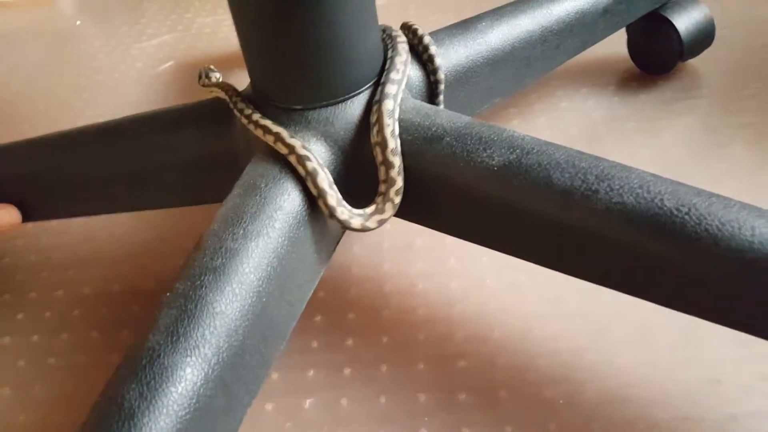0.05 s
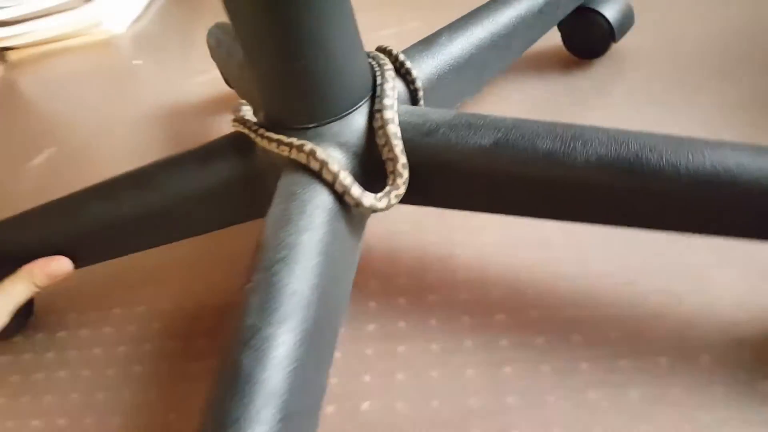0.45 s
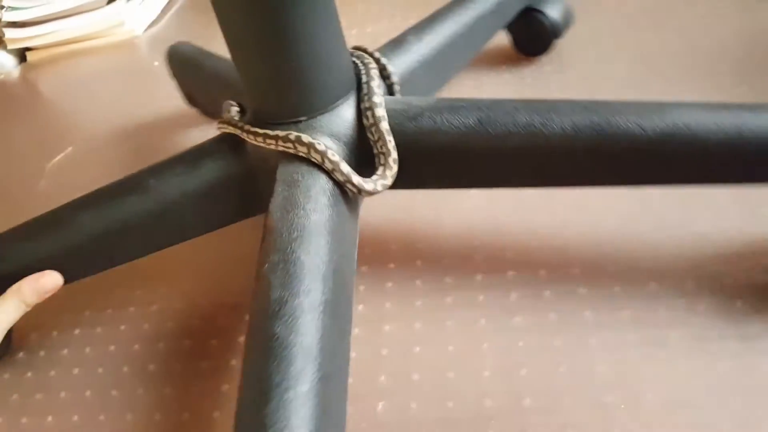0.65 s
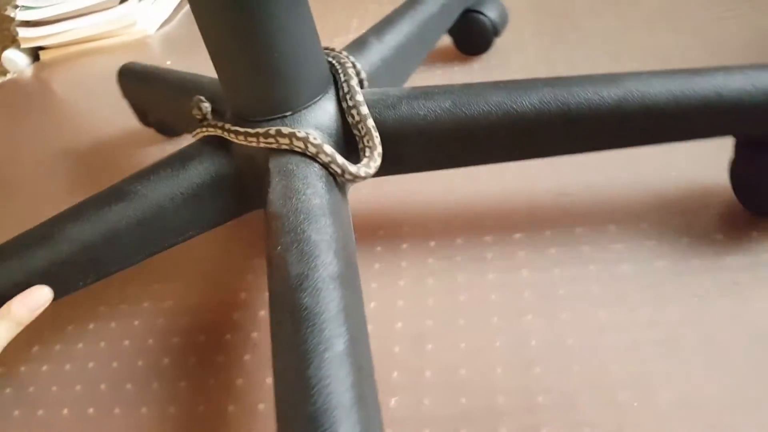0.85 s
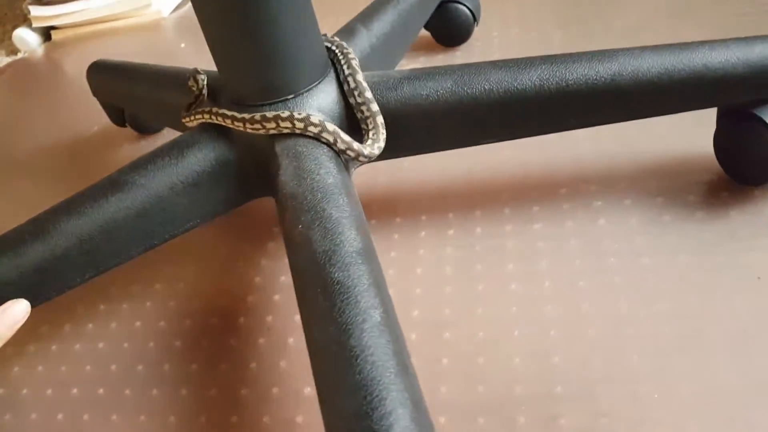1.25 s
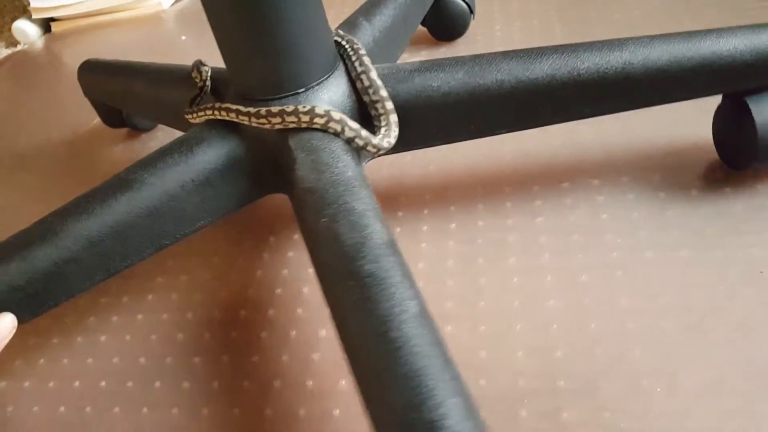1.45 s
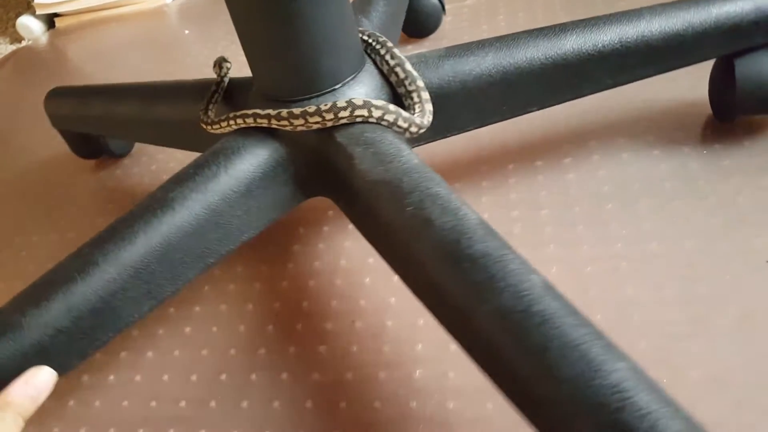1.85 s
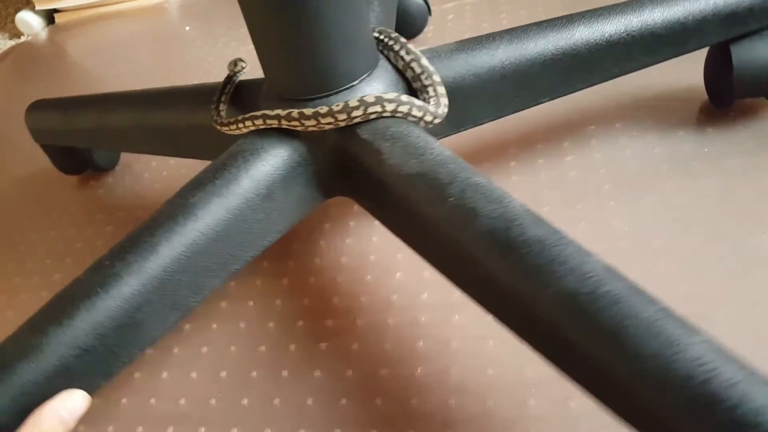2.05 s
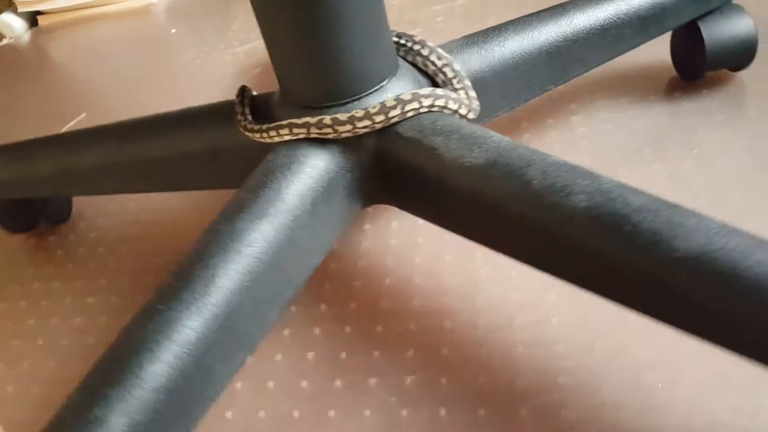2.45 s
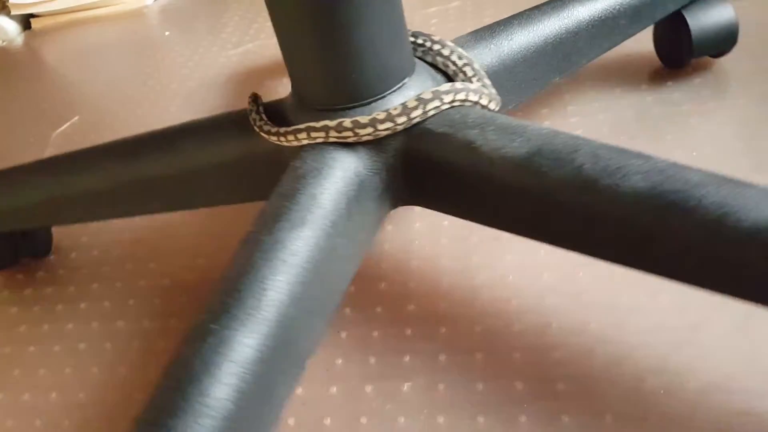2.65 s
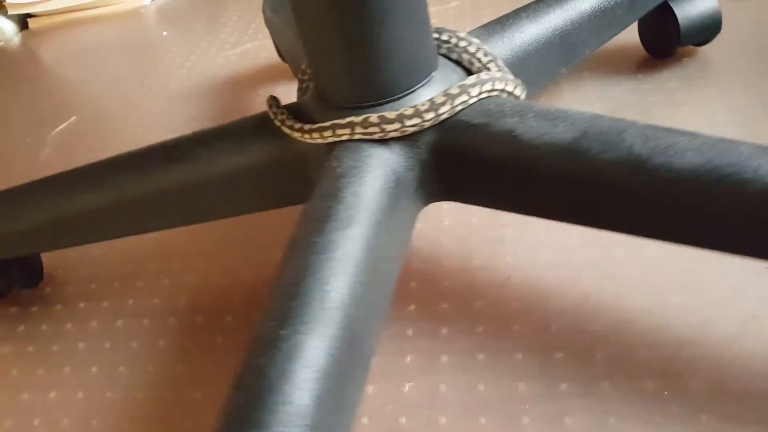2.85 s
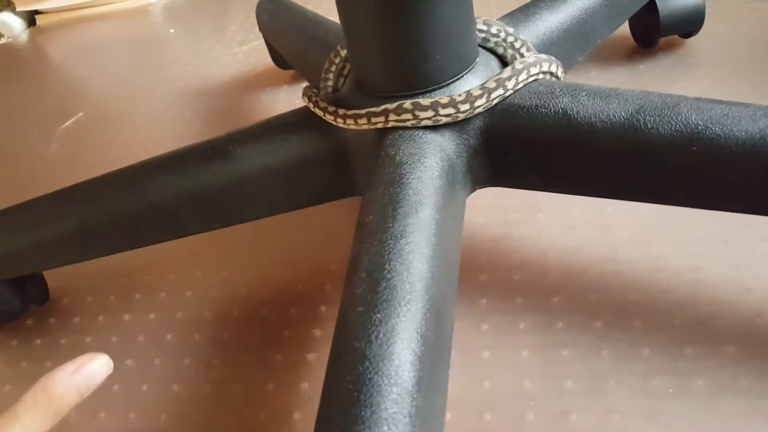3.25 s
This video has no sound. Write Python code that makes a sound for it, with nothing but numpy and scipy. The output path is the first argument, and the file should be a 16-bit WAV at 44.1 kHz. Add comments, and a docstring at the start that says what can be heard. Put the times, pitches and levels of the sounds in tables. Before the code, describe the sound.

Chair casters roll over a floor mat in two pushes, with low rumble and clicks.

```python
"""On a plastic floor mat in a quiet room, an office chair's five-legged base is turned in two pushes.
Small bumps under the casters drive the modes of the base into a rumble; dimples and studs add thumps.
Grit crunches, the casters knock as they swivel and rattle on their axles, and plastic parts tick.
Faint rustling comes with the movement, which ends in a thin scrape.
Behind it the room hisses, with a thin electrical whine."""
import sys
import numpy as np
from scipy import signal
from scipy.fft import rfft, irfft
from scipy.io import wavfile
from scipy.ndimage import uniform_filter1d

SR = 44100
rng = np.random.default_rng(int(sys.argv[2]) if len(sys.argv) > 2 else 0)


def transcribe(u):
    """Save the signal u as a 16-bit wav file named by the first command-line argument.

    u: samples, shape (n,) or (channels, n), limited to [-1, 1]; the rate is SR.
    q: integer samples, one column per channel.
    """
    v = np.clip(np.atleast_2d(u).T, -1, 1)
    q = np.round(v * 32767).astype(np.int16)
    wavfile.write(sys.argv[1], SR, q)


N = 145530
TIME = np.arange(N) / SR

# Rolling effort, heard as rumble. Each row: time in seconds, relative level in dB.
ROLL_LEVELS = [(0.03, -64), (0.15, -77), (0.22, -52), (0.265, -53.5), (0.31, -48.5), (0.42, -43),
               (0.55, -41.5), (0.7, -42), (0.81, -44), (0.96, -51.5), (1.05, -62), (1.15, -77.5),
               (1.39, -70), (1.5, -55.5), (1.62, -48), (1.69, -51), (1.74, -55), (1.92, -59), (2.05, -50),
               (2.16, -54.5), (2.26, -50), (2.4, -52), (2.5, -50.5), (2.73, -49), (2.92, -54), (3.01, -49),
               (3.1, -63), (3.14, -61.5), (3.18, -73.5)]
# Modes of base and mat. Each row: frequency in Hz, gain in dB, time to fall 60 dB (T60) in seconds.
BASE_MODES = [(82.5, -19, 0.053), (114.5, -10.5, 0.26), (139, -2, 0.12), (176.9, 2.5, 0.13),
              (205.5, -5, 0.1), (274, -19.5, 0.042), (390, -14.5, 0.014)]
# Spectrum of the drumming mat. Each row: frequency in Hz, relative level in dB.
MAT_SPECTRUM = [(18, -38), (30, -27), (48, -3.5), (75, 9), (100, -5), (140, 8), (290, -5), (400, -12),
                (800, -30), (4000, -48)]
# Wheels drop into dimples of the mat. Each row: start in seconds, relative level in dB, pitch in Hz.
DIMPLE_DROPS = [(0.323, -39.5, 166), (0.399, -37.5, 144), (0.64, -40, 150), (0.685, -33, 179.6),
                (0.721, -33.5, 182), (0.825, -36, 154), (0.872, -37.5, 126), (0.936, -36.5, 146),
                (1.786, -45.5, 125), (2.207, -38.5, 182), (2.243, -42, 200), (2.692, -40, 178),
                (2.798, -37, 169), (2.841, -38, 167.6), (2.901, -34.5, 177.6)]
# Wheels cross rows of the mat's studs. Each row: start in seconds, relative level in dB.
STUD_CROSSINGS = [(0.461, -48), (0.665, -50), (0.864, -52), (2.046, -49), (2.14, -54), (2.236, -46.5),
                  (2.385, -50), (2.474, -51), (2.555, -52), (2.635, -49), (2.725, -52), (2.809, -46)]
# Grit under the wheels. Each row: time in seconds, relative level in dB.
GRIT_LEVELS = [(0.15, -79), (0.22, -57.5), (0.26, -72.5), (0.3, -55), (0.35, -54.5), (0.375, -49),
               (0.41, -50.5), (0.52, -57.5), (0.62, -52), (0.76, -53.5), (0.825, -54.5), (0.865, -59.5),
               (0.94, -59.5), (1.02, -68), (1.15, -89), (1.42, -77), (1.55, -62), (1.64, -65.5),
               (1.72, -70.5), (1.93, -75.5), (2.03, -71), (2.2, -68), (2.5, -67.5), (2.62, -65),
               (2.8, -60.5), (2.94, -76), (3.01, -73), (3.13, -85)]
# Spectrum of the crunch. Each row: frequency in Hz, relative level in dB.
GRIT_SPECTRUM = [(150, -24), (300, -9.5), (400, -3.5), (560, 2), (760, -4), (980, -1), (1450, -10),
                 (1900, -7.5), (2400, -17.5), (3200, -18.5), (4500, -28), (9000, -51)]
# Casters knock in their sockets.
# Each row: start in seconds, relative level in dB, contact cutoff in Hz, share of the full ring time.
CASTER_KNOCKS = [(0.214, -44.5, 4200, 0.35), (0.3599, -40.5, 7000, 1), (0.3625, -36, 5240, 0.33),
                 (0.365, -34, 2900, 0.75), (0.37, -38.5, 2600, 0.7), (0.378, -40.5, 2300, 0.81),
                 (0.4686, -39.5, 4170, 0.68), (0.605, -44, 1300, 0.96), (0.681, -47, 1600, 0.63),
                 (0.726, -41, 1410, 0.97), (0.766, -42.5, 1190, 0.69), (0.831, -46.5, 1300, 0.71),
                 (0.921, -54, 2200, 0.55), (1.591, -49, 5000, 0.3), (1.643, -49.5, 1500, 0.75),
                 (1.658, -42.5, 550, .4), (1.737, -36.5, 620, 0.38), (1.821, -56.5, 2250, 0.2),
                 (1.871, -54.5, 2200, 0.33), (2.046, -49.5, 2200, 0.26), (2.142, -54, 1100, 0.38),
                 (2.253, -46.5, 2200, 0.31), (2.324, -53, 796, 0.44), (2.378, -53, 1800, 0.28),
                 (2.472, -45, 750, 0.49), (2.516, -54, 2200, .3), (2.542, -56, 3100, 0.21),
                 (2.597, -41.5, 895, 0.7), (2.606, -41, 700, 0.33), (2.701, -49, 2000, .3),
                 (2.757, -40, 840, 0.58), (2.7638, -42.5, 1900, 0.55), (2.9, -46, 800, 0.48),
                 (3.007, -46.5, 700, 0.33)]
# Modes of a caster. Each row: frequency in Hz, gain in dB, full T60 in seconds.
CASTER_MODES = [(312, -5, 0.067), (433, -10, 0.063), (543, -6, 0.053), (635, -3.5, 0.059), (859, -6, 0.074),
                (970, -1.5, 0.05), (1134, -1.5, 0.045), (1416, -5, 0.057), (1874, -11.5, 0.06),
                (2680, -10, 0.074), (3270, -3.5, .025), (5090, -10.5, 0.08), (5900, -25, 0.018),
                (7120, -7, 0.047)]
# Wheels rattle on their axles. Each row: time in seconds, relative level in dB.
RATTLE_LEVELS = [(1.95, -74), (2.05, -70), (2.2, -71.5), (2.45, -64), (2.6, -62), (2.72, -63.5),
                 (3.01, -68), (3.08, -85)]
# Plastic ticks.
# Each row: start in seconds, relative level in dB, tilt in dB per octave, decay constant in seconds.
PLASTIC_TICKS = [(0.187, -51.5, -2, 0.0019), (0.228, -57, 2, .0025), (0.283, -51.5, 0, 0.0028),
                 (0.3608, -51, 4, 0.0033), (0.391, -49, 2, .003), (0.407, -48, 7, 0.0013),
                 (0.469, -41, 8, 0.0015), (0.5854, -51, 1, .0015), (0.596, -47.5, 1, 0.0016),
                 (0.6886, -55, 7, .002), (0.729, -57.5, 5, .003), (0.752, -52, -3, 0.0022),
                 (0.806, -55.5, 5, 0.0038), (0.824, -52, 1.5, 0.0024), (0.8849, -51, 1.5, 0.0031),
                 (0.921, -53.5, -2.5, 0.0022), (1.324, -51, 1, 0.0027), (1.455, -51, 0, 0.0021),
                 (1.512, -48, 1, 0.0016), (1.568, -52.5, -5, 0.0023), (1.592, -46.5, -3.5, 0.0028),
                 (1.604, -52.5, -2.5, 0.0031), (1.641, -57, 0, 0.0022), (1.947, -58.5, 4.5, 0.0031),
                 (2.243, -60.5, 2, .0025), (2.4855, -46, 0.5, 0.0019), (2.542, -46.5, -1, 0.0017),
                 (2.864, -60, 1, 0.005), (3.081, -58, 3.5, .0025)]
# Spectrum of a tick before its tilt. Each row: frequency in Hz, relative level in dB.
TICK_SPECTRUM = [(500, -1.5), (1500, 11.5), (3000, 9.5), (6000, 0), (9500, -1.5), (13000, 2), (16000, 2)]
# Light rubbing. Each row: time in seconds, level in dB.
RUSTLE_LEVELS = [(0.1, -100), (0.2, -67), (0.26, -68), (0.295, -58.5), (0.345, -64.5), (0.385, -55.5),
                 (0.44, -63), (0.485, -59.5), (0.55, -71.5), (0.66, -75), (0.73, -68), (0.78, -70),
                 (0.88, -67), (1.05, -75.5), (1.42, -78), (1.6, -64.5), (1.72, -72.5), (2.75, -72),
                 (2.85, -66.5), (2.96, -65.5), (3.04, -71.5)]
# Spectrum of the rubbing. Each row: frequency in Hz, relative level in dB.
RUSTLE_SPECTRUM = [(800, 10), (2500, 8), (4500, 0), (7000, -2), (9500, -4.5), (13000, -1.5), (16000, -5)]
# The scrape as the base slows. Each row: time in seconds, level in dB, centre frequency in Hz.
SCRAPE_PATH = [(2.76, -95, 12660), (2.82, -81, 12400), (2.96, -74.5, 11700), (3.0, -80, 11460),
               (3.04, -97, 11300)]
# Steady electrical tones. Each row: frequency in Hz, left level in dB, right level in dB.
ELECTRICAL_TONES = [(1361.5, -70, -80.5), (2724, -86.5, -94)]
# Pitch of the electrical whine. Each row: time in seconds, frequency in Hz.
WHINE_PITCH = [(0, 10730), (.55, 10752), (.7, 10790), (1.2, 10805), (1.5, 10880), (2.05, 10935),
               (2.6, 10865), (2.85, 10915), (3.3, 10930)]
# Spectrum of the room's hiss. Each row: frequency in Hz, relative level in dB.
HISS_SPECTRUM = [(25, -13.5), (80, -8), (118, 0), (170, -28), (400, -21), (550, -25), (1000, -21.5),
                 (1380, -21), (1650, -22.5), (2500, -23.5), (3200, -20.5), (4000, -29.5), (5500, -32),
                 (9500, -36), (13000, -32), (15800, -30)]
# Likeness of the sound at the two ears. Each row: frequency in Hz, correlation from -1 to 1.
EAR_CORRELATION = [(40, 0.75), (170, 0.7), (350, 0.1), (700, 0.56), (1200, -.25), (2500, 0.01), (14000, 0)]

BASE_PAN_DB, CASTER_PAN_DB = 2, 0.5
ROOM_T60_S, ROOM_DB = 0.19, -4.5


def rumble():
    """Forced vibration: small bumps ring the base through soft tyres while the mat drums underneath."""
    bumps = grains(per_s=450, spread_db=1.5)[0]
    base = sum(from_db(db) * ring(bumps, hz, t60) for hz, db, t60 in BASE_MODES)
    base = from_db(-2) * evened(lowpass(base, hz=480), samples=1800)
    mat = coloured(grains(per_s=450, spread_db=1.5), MAT_SPECTRUM)
    mat = from_db(-9.5) * evened(mat, samples=3000)
    effort = level(ROLL_LEVELS)
    mat_effort = effort.mean() * (effort / effort.mean()) ** 0.72  # the mat follows 72% of the dB swing
    return pan(BASE_PAN_DB) * effort * base + pan(4.5) * mat_effort * mat


def dimple_thumps():
    """Damped oscillation: each drop of a wheel into a dimple sets the legs swinging."""
    out = np.zeros(N)
    for start, db, hz in DIMPLE_DROPS:
        add_at(out, start, from_db(db - 1) * swing(hz, rise_s=0.0057))
    return pan(BASE_PAN_DB) * out


def stud_beats():
    """Impact excitation: the mat gives a deep beat as a wheel crosses a row of studs."""
    out = np.zeros(N)
    for start, db in STUD_CROSSINGS:
        add_at(out, start, from_db(db - 6) * swing(hz=77, rise_s=0.009))
    return pan(BASE_PAN_DB) * out


def grit():
    """Shot noise: grains crunch under the wheels as random impulses in uneven clumps."""
    crunch = grains(per_s=1300, spread_db=1.5) * from_db(3.5 * drift(hz=25))
    crunch = evened(coloured(crunch + room(crunch), GRIT_SPECTRUM), samples=2200)
    return pan(2) * from_db(-0.5) * level(GRIT_LEVELS) * crunch


def caster_knocks():
    """Modal ringing after a crack: a soft contact dulls the caster's knock, a loaded wheel shortens it."""
    out, t = np.zeros((2, N)), TIME[:SR // 4]
    crack_db, crack_s = -2.5, 0.0055
    for start, db, contact_hz, ring_share in CASTER_KNOCKS:
        hit = from_db(crack_db) * rng.standard_normal((2, len(t))) * np.exp(-t / crack_s)
        for hz, mode_db, t60 in CASTER_MODES:
            ear_lag_s = rng.normal(0, 0.00021, (2, 1))
            envelope = from_db(mode_db + rng.normal(0, 1.5) - 60 * t / (t60 * ring_share))
            hit += envelope * rng.choice([-1, 1]) * np.sin(2 * np.pi * hz * (t - ear_lag_s))
        add_at(out, start, from_db(db - 4.5) * lowpass(hit, contact_hz))
    return pan(CASTER_PAN_DB) * (out + from_db(-11) * room(out))


def axle_rattle():
    """Repeated impact: loaded wheels chatter on their axles, tapping the caster's damped modes."""
    ring_share = 0.43
    modes = sum(from_db(db) * ring(grains(per_s=110, spread_db=3.5), hz, t60 * ring_share)
                for hz, db, t60 in CASTER_MODES)
    taps = lowpass(modes, hz=505)
    centred = taps + taps.mean(axis=0)
    return pan(CASTER_PAN_DB) * level(RATTLE_LEVELS) * evened(centred, samples=3000)


def plastic_ticks():
    """Broadband transients: plastic parts snap for a few milliseconds and leave a faint tail."""
    out, t = np.zeros((2, N)), TIME[:SR // 5]
    rise_s, tail_db, tail_s = 0.00028, -19, 0.046
    attack = 1 - np.exp(-t / rise_s)
    tail = from_db(tail_db) * np.exp(-t / tail_s)
    for start, db, tilt, decay_s in PLASTIC_TICKS:
        envelope = attack * (np.exp(-t / decay_s) + tail)
        spectrum = [(hz, band_db + tilt * np.log2(hz)) for hz, band_db in TICK_SPECTRUM]
        noise = coloured(rng.standard_normal((2, len(t))), spectrum)
        add_at(out, start, from_db(db) * envelope * noise)
    return pan(0.5) * out


def rustle():
    """Friction noise: light rubbing gives off fine, bright grains of sound."""
    rub = grains(per_s=2500, spread_db=3.5)
    return level(RUSTLE_LEVELS) * coloured(rub + room(rub), RUSTLE_SPECTRUM)


def scrape():
    """Stick-slip friction: tiny slips excite a high resonance that sinks as the movement slows."""
    times, db, hz = np.transpose(SCRAPE_PATH)
    slips = rms_one(lowpass(grains(per_s=500, spread_db=1.5) + 1e-18, hz=800))
    carrier = np.sqrt(2) * glide(np.interp(TIME, times, hz))
    return from_db(np.interp(TIME, times, db)) * slips * carrier


def electrical_whine():
    """Pure tones: two hold steady while a faint high one wanders and creeps upward."""
    tones = sum(from_db([[left], [right]]) * np.sin(2 * np.pi * hz * TIME)
                for hz, left, right in ELECTRICAL_TONES)
    whine_hz = np.interp(TIME, *np.transpose(WHINE_PITCH)) + 5 * drift(hz=4.5)
    return tones + from_db(-89.5) * glide(whine_hz)


def room_hiss():
    """Stationary noise: the quiet room hisses evenly, strongest in the bass."""
    return pan(2.5) * from_db(-68) * coloured(rng.standard_normal((2, N)), HISS_SPECTRUM)


def room(x):
    """Reverberation: a small room's diffuse reflections decay exponentially, unlike at each ear."""
    t = TIME[:SR // 2]
    tail = rng.standard_normal((2, len(t))) * from_db(-60 * t / ROOM_T60_S)
    tail /= np.sqrt(np.sum(tail ** 2) / 2)
    return from_db(ROOM_DB) * signal.fftconvolve(x, tail, axes=1)[:, :N]


def swing(hz, rise_s):
    """Critically damped envelope: a soft blow's low tone swells and dies within a few cycles."""
    t = TIME[:SR // 8]
    return t / rise_s * np.exp(1 - t / rise_s) * np.sin(2 * np.pi * hz * t)


def ring(clicks, hz, t60):
    """Resonance: clicks set one damped mode ringing."""
    r, w = from_db(-60 / (t60 * SR)), 2 * np.pi * hz / SR
    return signal.lfilter([1, 0, -1], [1, -2 * r * np.cos(w), r * r], clicks + 1e-18)


def grains(per_s, spread_db):
    """Poisson process: two independent trains of clicks of uneven size."""
    sizes = from_db(spread_db * np.minimum(rng.exponential(1, (2, N)), 4))
    return sizes * rng.choice([-1, 1], (2, N)) * (rng.random((2, N)) < per_s / SR)


def coloured(pair, spectrum):
    """Spectral shaping: two independent signals become left and right, alike in the bass."""
    hz = np.linspace(0, SR / 2, pair.shape[1] // 2 + 1)
    mid, side = rfft(pair) * from_db(at_hz(spectrum, hz))
    alike = at_hz(EAR_CORRELATION, hz)
    mid, side = mid * np.sqrt(1 + alike), side * np.sqrt(1 - alike)
    return rms_one(irfft([mid + side, mid - side], pair.shape[1]))


def drift(hz):
    """Low-passed noise: a slow random wander of unit power."""
    r = np.exp(-2 * np.pi * hz / SR)
    return rms_one(signal.lfilter([1], [1, -2 * r, r * r], rng.standard_normal(2 * N))[N:])


def evened(x, samples):
    """Division by the running RMS takes slow swings of level out of a texture."""
    power = np.mean(np.atleast_2d(x) ** 2, axis=0)
    return x / np.sqrt(uniform_filter1d(power, samples) + 1e-12)


def lowpass(x, hz):
    """Second-order roll-off above the cutoff."""
    return signal.sosfilt(signal.butter(2, hz, fs=SR, output="sos"), x)


def glide(hz):
    """A sine whose phase is the integral of its frequency."""
    return np.sin(2 * np.pi * np.cumsum(hz) / SR)


def add_at(out, start_s, sound):
    """Superpose a sound from its start time on."""
    span = out[..., int(start_s * SR):][..., :sound.shape[-1]]
    span += sound[..., :span.shape[-1]]


def at_hz(points, hz):
    """Interpolation on a log-frequency axis."""
    freqs, values = np.transpose(points)
    return np.interp(np.log(hz + 1), np.log(freqs), values)


def level(rows):
    """Gain over time from points in seconds and dB."""
    return from_db(np.interp(TIME, *np.transpose(rows)))


def pan(db):
    """Interaural level difference: channel gains for left minus right in dB."""
    return from_db(np.array([[db], [-db]]) / 2)


def rms_one(x):
    """Normalisation to unit power."""
    return x / np.sqrt(np.mean(x ** 2) + 1e-20)


def from_db(db):
    """Decibels to amplitude ratio."""
    return 10 ** (np.asarray(db) / 20)


def scene():
    """Superposition: the sounds of the turning base add to those of the quiet room."""
    rolling = rumble() + dimple_thumps() + stud_beats() + grit()
    clatter = axle_rattle() + caster_knocks() + plastic_ticks()
    return rolling + clatter + rustle() + scrape() + room_hiss() + electrical_whine()


def record(dry):
    """Band limiting: a steep low-pass cuts the highest treble."""
    cutoff_hz = 15900
    return signal.sosfilt(signal.ellip(10, .1, 70, cutoff_hz, fs=SR, output="sos"), dry)


dry = scene()
out = record(dry)
transcribe(out)
```